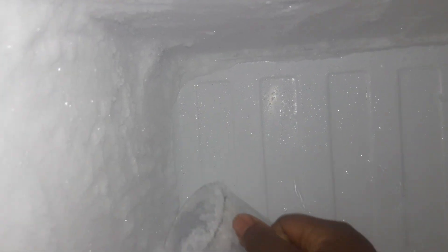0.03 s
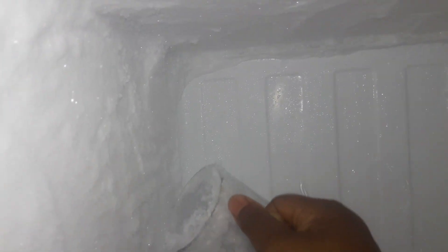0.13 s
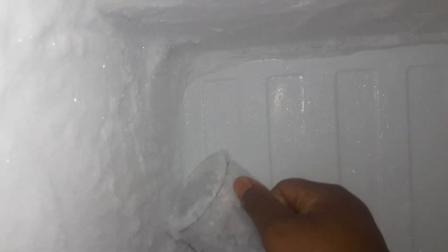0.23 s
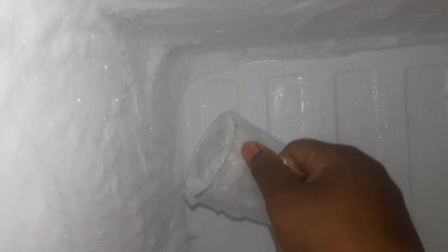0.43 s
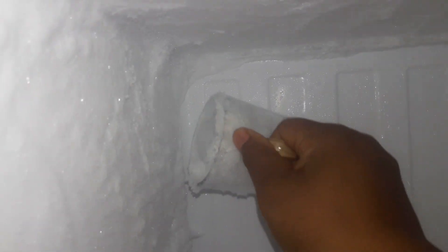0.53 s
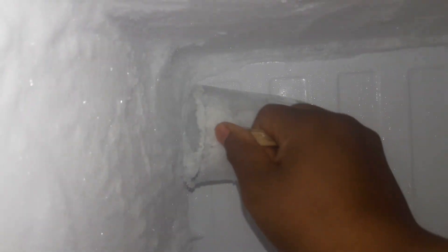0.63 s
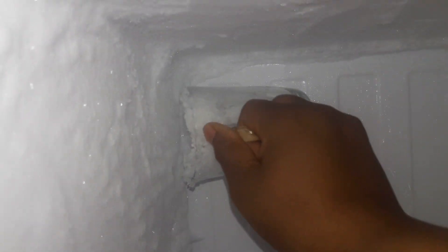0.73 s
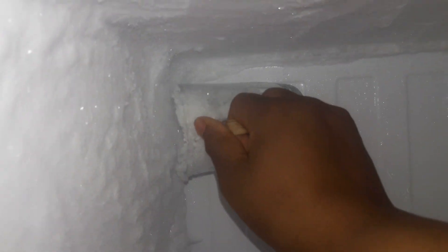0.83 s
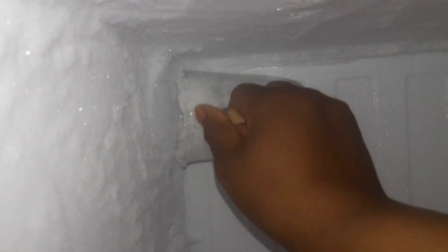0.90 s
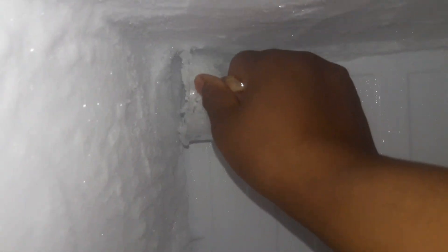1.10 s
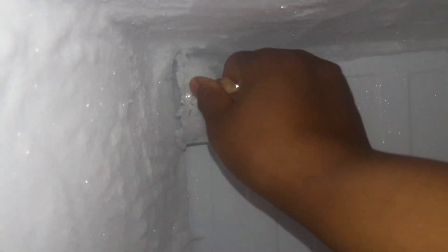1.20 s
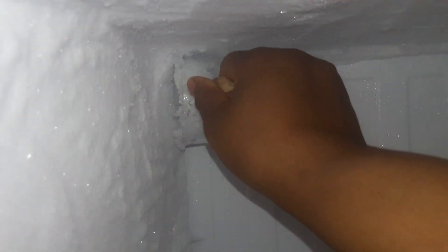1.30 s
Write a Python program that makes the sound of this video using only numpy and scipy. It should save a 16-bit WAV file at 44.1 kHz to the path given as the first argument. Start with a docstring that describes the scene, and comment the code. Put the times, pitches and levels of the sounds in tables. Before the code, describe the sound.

A drinking glass scrapes frost inside a small freezer, heard close with a faint boxy echo. From 0.12 to about 0.3 seconds it crunches, with glassy pings and low hollow knocks. Tiny flakes snap near 0.29, 0.43 and 0.7. A cluster of wall knocks hits at 0.82, followed by a short scrape, then brighter pinging crunches near 1.09 and 1.31. Quiet wavering hum and dull hiss continue throughout.

```python
"""A drinking glass is pushed up the frosted wall of a small freezer, over a quiet hum and dull hiss throughout.
From 0.12 s its rim crunches through the frost, grains ringing the glass, with pings and low wall knocks.
Flakes snap at the end of that burst and in the lull; at 0.82 s a cluster of knocks rings the hollow wall.
A short scrape follows, then brighter crunches near 1.09 and 1.31 s, where the catching rim pings the glass.
Noise grains, single pushes and short noise cracks drive resonances; a faint boxy echo follows them."""
import sys
import numpy as np
from scipy import signal
from scipy.fft import rfft, irfft, next_fast_len
from scipy.io import wavfile

SR = 44100
rng = np.random.default_rng(int(sys.argv[2]) if len(sys.argv) > 2 else 0)


def transcribe(u):
    """Save the signal u as a 16-bit wav file named by the first command-line argument.

    u: samples, shape (n,) or (channels, n), limited to [-1, 1]; the rate is SR.
    q: integer samples, one column per channel.
    """
    v = np.clip(np.atleast_2d(u).T, -1, 1)
    q = np.round(v * 32767).astype(np.int16)
    wavfile.write(sys.argv[1], SR, q)


N = 59535

# Resonances of the glass. Each row: pitch in Hz, width in Hz, relative level in dB (while scraping).
GLASS_MODES = [(1178, 43, 7.5), (1281, 69, 4.5), (1593, 60, -0.5), (1837, 140, -10), (2036, 61, 2),
               (2280, 88, 1.5), (2514, 94, -0.5), (2640, 78, 0), (3270, 360, -7), (4580, 140, -6),
               (4800, 80, -13.5), (5900, 150, -13), (7260, 110, -18), (8660, 105, -14), (10250, 250, -18.5)]
# Modes of the hollow wall. Each row: pitch in Hz, relative level in dB, free ring to -60 dB in seconds.
WALL_MODES = [(113, -46, 0.039), (171, 4.5, 0.087), (217.6, -1, 0.069), (287, -1, 0.062),
              (353, -21.5, 0.13), (477, -22.5, 0.3), (523.5, 1, .14), (640, -20, 0.027), (796, -4, 0.051),
              (1020, -11, 0.02), (1148, -40, .07), (1577, -7.5, 0.02), (1907, -16.5, 0.044),
              (2394, -14.5, 0.062)]


def from_db(db):
    """Amplitude factor of a level in dB."""
    return 10 ** (np.asarray(db) / 20)


def rms_one(x):
    """Scale a signal to an RMS of 1."""
    return x / np.sqrt(np.mean(x ** 2) + 1e-20)


def in_time(rows):
    """Draw straight lines between rows that start with a time; one curve per further column."""
    s, *columns = np.transpose(rows)
    return [np.interp(np.arange(N) / SR, s, column) for column in columns]


def colour(x, points):
    """Give a dense signal the spectrum of a table, interpolated over log frequency, at RMS 1."""
    hz = np.maximum(np.arange(N // 2 + 1) * SR / N, 1)
    table = np.array(points)
    gain_db = np.interp(np.log(hz), np.log(table[:, 0]), table[:, 1])
    return rms_one(irfft(rfft(x) * from_db(gain_db), N))


def ring(x, hz, t60):
    """A unit click sets a decaying sine of height 1 ringing; t60 in seconds."""
    r = from_db(-60 / (t60 * SR))
    w = 2 * np.pi * hz / SR
    return signal.lfilter([0, np.sin(w)], [1, -2 * r * np.cos(w), r * r], x + 1e-18)


def resonate(x, hz, width_hz):
    """Resonance with gain 1 on top."""
    r = np.exp(-np.pi * width_hz / SR)
    feedback = [1, -2 * r * np.cos(2 * np.pi * hz / SR), r * r]
    return signal.lfilter(np.array([1, 0, -1]) * (1 - r * r) / 2, feedback, x)


def soft_push(s, order, cut_hz):
    """A unit click at s seconds, rounded by a low-pass: the softer the contact, the lower its cut-off."""
    click = np.zeros(N)
    click[int(s * SR)] = 1
    return signal.sosfilt(signal.butter(order, cut_hz, fs=SR, output="sos"), click + 1e-18)


def grains():
    """Frost crystals break at random moments with uneven sizes and either sign."""
    grains_per_s, spread_db = 4400, 2.5
    sizes = from_db(spread_db * np.minimum(rng.exponential(1, N), 5)) * rng.choice([-1, 1], N)
    return rms_one(sizes * (rng.random(N) < grains_per_s / SR))


def scraped_glass(x, favour_hz):
    """Grains ring the glass modes, weaker the further they lie from the favoured pitch."""
    favour_db_per_octave, favour_most_db = 11.5, 13
    out = np.zeros(N)
    for k, (hz, width_hz, db) in enumerate(GLASS_MODES):
        loss_db = np.minimum(favour_db_per_octave * abs(np.log2(hz / favour_hz)), favour_most_db)
        out += (-1) ** k * resonate(x * from_db(db - loss_db), hz, width_hz)
    return out


def rubbed_wall(x):
    """Grains shake the wall modes, whose ring is cut short while the rim presses on."""
    # How much the rubbing reaches the deep modes. Each row: time in seconds, level in dB.
    deep_rows = [(.1, 6.5), (.5, 2.5), (.83, -0.5), (.95, -7), (1.06, -17), (1.2, -16.5), (1.35, -5.5)]
    deep_db, = in_time(deep_rows)
    deep_below_hz, ring_share = 330, 0.13
    middle_hz, loss_db_per_octave = 560, 7  # rubbing favours the middle modes
    out = np.zeros(N)
    for k, (hz, db, t60) in enumerate(WALL_MODES):
        push = x * from_db(deep_db * (hz < deep_below_hz))
        level = from_db(db - loss_db_per_octave * abs(np.log2(hz / middle_hz)))
        out += (-1) ** k * level * ring(push, hz, t60 * ring_share)
    return out


def scrape():
    """The rim ploughs the frost: grains ring the glass, crackle in the air and shake the wall."""
    # Each row: time in seconds, crunch in the glass in dB, rumble passed to the wall in dB,
    # crackle in the air in dB, pitch region the glass favours in Hz.
    plough_rows = [(.12, -76, -55.5, -83, 1500), (.134, -54.5, -77, -49.5, 1780),
                   (.146, -36, -30.5, -42, 1410), (.156, -49, -35, -49.5, 1270),
                   (.178, -47, -44, -47, 1280), (.198, -56, -45.5, -54.5, 1310),
                   (.21, -44.5, -49.5, -45, 1290), (.224, -42.5, -30, -39.5, 1480),
                   (.24, -40, -37.5, -35.5, 1695), (.256, -47, -31, -55, 1300), (.29, -61, -37, -48, 1390),
                   (.312, -74, -41.5, -56, 1310), (.335, -82, -44, -62.5, 1310),
                   (.45, -60.5, -48.5, -77, 1500), (.52, -74, -57, -81, 1510),
                   (.815, -99, -60.5, -83, 1810), (.835, -72, -22.5, -81, 1580),
                   (.855, -49, -38, -79, 1570), (.894, -40, -39, -55, 1852), (.92, -51.5, -41, -57, 1900),
                   (.95, -57.5, -50, -58, 2000), (1.072, -67, -50, -74.5, 1630),
                   (1.08, -45, -36, -57, 1890), (1.088, -35, -34, -38.5, 2140),
                   (1.096, -32.5, -39, -47, 2040), (1.102, -50, -42, -55, 2180),
                   (1.134, -45.5, -50.5, -51.5, 2040), (1.18, -55, -53, -56, 2149),
                   (1.25, -67, -55, -59.5, 2000), (1.292, -55, -56, -51, 2000),
                   (1.306, -36.5, -54, -41.5, 2120), (1.316, -31, -39.5, -37.5, 1970),
                   (1.326, -51, -34.5, -44.5, 2000), (1.35, -64, -65, -53, 2000)]
    # Broad crackle of breaking frost. Each row: frequency in Hz, relative density in dB per Hz.
    crackle_spectrum = [(600, -17), (1000, -12.5), (1300, -4.5), (2200, -13), (3000, -15.5), (4400, -18.5),
                        (6000, -21), (7800, -27), (9000, -27), (12000, -34.5), (16000, -34.5)]
    crunch_db, rumble_db, crackle_db, favour_hz = in_time(plough_rows)
    g = grains()
    # each body is levelled by its response to steady grains
    crunch = scraped_glass(g * from_db(crunch_db), favour_hz) / np.std(scraped_glass(g, favour_hz))
    crackle = from_db(crackle_db) * colour(grains(), crackle_spectrum)
    rumble = rubbed_wall(g * from_db(rumble_db)) / np.std(rubbed_wall(g))
    return crunch + crackle + rumble


def catches():
    """The rim catches and lets go: one sharp push rings the glass modes near the favoured pitch."""
    # Each row: start in seconds, level in dB, favoured pitch in Hz.
    catch_rows = [(0.1434, -36, 1220), (0.1439, -37, 2320), (0.2087, -47, 1280), (1.0868, -27.5, 1930),
                  (1.0915, -27.5, 2170), (1.106, -46, 2160), (1.3127, -35.5, 1410), (1.3154, -28.5, 2700)]
    favour_db_per_octave, cut_hz = 48, 8900
    out = np.zeros(N)
    for s, db, favour_hz in catch_rows:
        push = soft_push(s, 2, cut_hz)
        for hz, width_hz, _ in GLASS_MODES:
            level = from_db(db - favour_db_per_octave * abs(np.log2(hz / favour_hz)))
            t60 = np.log(1000) / np.pi / width_hz  # a narrow resonance rings long
            out += level * ring(push, hz, t60)
    return out


def knocks():
    """The rim strikes every mode of the wall with a soft contact pulse; pressure shortens the ring."""
    # Each row: start in seconds, level in dB, ring length as share of the free ring,
    # contact cut-off in Hz, tilt of the modes in dB per octave.
    knock_rows = [(0.1434, -33.5, 1, 565, 3.4), (0.149, -26, 0.4, 660, 5.6), (0.2368, -11.5, 1, 628, -1.1),
                  (0.2401, -15.5, 1, 560, 1.1), (0.8172, -15.5, 0.47, 2370, 1.5),
                  (0.818, -21, 0.86, 1270, 3.7), (0.8206, -11.5, .25, 864, -1.1),
                  (0.8235, -12.5, 0.19, 1100, 4), (0.8292, -22, 0.18, 860, 2),
                  (1.322, -41.5, 0.79, 800, -0.5)]
    tilt_pivot_hz = 400
    out = np.zeros(N)
    for s, db, share, cut_hz, tilt_db in knock_rows:
        push = soft_push(s, 3, cut_hz)
        for hz, mode_db, t60 in WALL_MODES:
            level = from_db(db + mode_db + tilt_db * np.log2(hz / tilt_pivot_hz))
            out -= level * ring(push, hz, t60 * share)
    return out


def snaps():
    """Flakes of frost snap: a short decaying noise crack, heard broad and through a brief resonance."""
    # Each row: start in seconds, ring level in dB, pitch in Hz, crack decay to -60 dB in seconds,
    # broad crack level in dB.
    snap_rows = [(0.2887, -34, 3840, 0.015, -50), (0.4315, -27.5, 2460, 0.018, -38),
                 (0.7058, -27, 1715, 0.023, -56), (0.8192, -12.5, 2610, 0.017, -63),
                 (0.8843, -39, 2380, .015, -57.5)]
    band = signal.butter(3, [700, 5540], "band", fs=SR, output="sos")  # Hz
    noises = rng.standard_normal((len(snap_rows), N))
    out, t = np.zeros(N), np.arange(N) / SR
    for (s, db, hz, t60, crack_db), noise in zip(snap_rows, noises):
        crack = noise * (t >= s) * from_db(-60 * np.maximum(t - s, 0) / t60)
        pitched = resonate(resonate(crack, hz, 0.22 * hz), hz, 0.48 * hz)
        out += from_db(crack_db) * signal.sosfilt(band, crack) + from_db(db) * pitched
    return out


def box(x):
    """Short feedback delays between the hard walls, duller on every round."""
    t60_s, cut_hz = .3, 2480
    size = next_fast_len(N + SR)
    w = 2 * np.pi * np.arange(size // 2 + 1) / size
    dull = 1 / (1 + 1j * w * SR / (2 * np.pi * cut_hz))
    total = 0
    for k, lag in enumerate([.0071, .0093, .0119, .0137, .0163, .0191]):  # seconds
        loop = from_db(-60 * lag / t60_s) * dull * np.exp(-1j * w * lag * SR)
        total = total + (-1) ** k * loop / (1 - loop)  # all rounds summed
    return irfft(rfft(x, size) * total, size)[:N]


def cabinet():
    """A low narrow-band hum near 160 Hz, made of a tone and narrow noise, over a dull steady hiss."""
    # The hum's chance rises and falls, typed as a tone's pitch and level.
    # Each row: time in seconds, pitch in Hz, RMS level in dB.
    hum_rows = [(0, 140, -46), (.03, 149.6, -56), (.12, 163.9, -50.5), (.3, 160.9, -53), (.36, 165.1, -41),
                (.43, 167, -42), (.46, 161.4, -71), (.52, 160.7, -46), (.6, 162.5, -60), (.65, 163, -66),
                (.71, 164.4, -41.5), (.78, 162.3, -54), (.9, 152.9, -38.5), (.95, 154.5, -47),
                (.99, 153.2, -43), (1.04, 153.5, -53), (1.09, 160.1, -87), (1.14, 163.2, -65),
                (1.19, 158, -61), (1.25, 150.8, -46.5), (1.3, 157, -59), (1.35, 157.4, -38)]
    # Steady noise. Each row: frequency in Hz, relative density in dB per Hz.
    hiss_spectrum = [(20, -60), (40, -8.5), (68, -3.5), (105, -4.5), (160, 3), (230, -57.5), (350, -8),
                     (520, -17.5), (750, -10.5), (900, -29), (1250, -24.5), (1600, -20.5), (2200, -29.5),
                     (4000, -39), (6000, -43.5), (9000, -53.5), (13000, -45.5), (16000, -50.5)]
    noise_hz, width_hz, noise_db, hiss_db = 165, 25.3, -56, -52
    hum_hz, hum_db = in_time(hum_rows)
    tone = np.sqrt(2) * from_db(hum_db) * np.sin(2 * np.pi * np.cumsum(hum_hz) / SR)
    narrow = resonate(rng.standard_normal(N + SR), noise_hz, width_hz)
    narrow = resonate(narrow, noise_hz, 2 * width_hz)[SR:]  # the first second lets the resonance settle
    hiss = colour(rng.standard_normal(N), hiss_spectrum)
    return tone + from_db(noise_db) * rms_one(narrow) + from_db(hiss_db) * hiss


def scene():
    """Rim, wall and frost close by with their boxy echo, over the cabinet; one channel."""
    near_low_cut_hz, box_db = 163, -24.5
    near = scrape() + catches() + knocks() + snaps()
    # the microphone picks up little deep bass from the near sounds
    near = signal.sosfilt(signal.butter(4, near_low_cut_hz, "high", fs=SR, output="sos"), near)
    return (near + from_db(box_db) * box(near) + cabinet())[None]


def record(dry):
    """A steep low-pass cuts the top: 70 dB down from 16350 Hz."""
    return signal.sosfilt(signal.cheby2(20, 70, 16350, fs=SR, output="sos"), dry)


dry = scene()
out = record(dry)
transcribe(out)
```